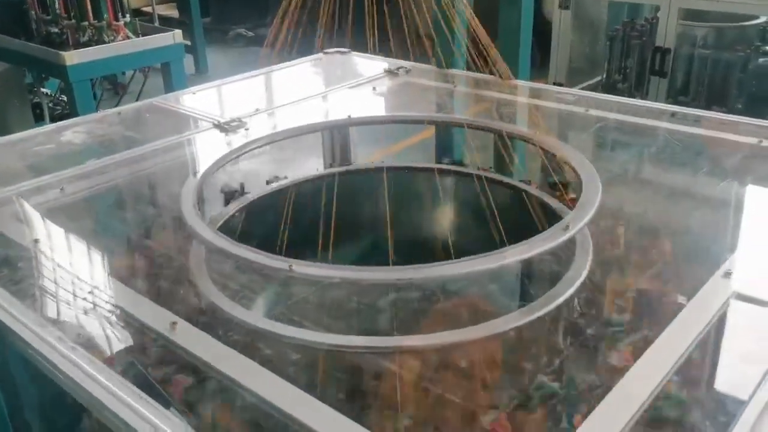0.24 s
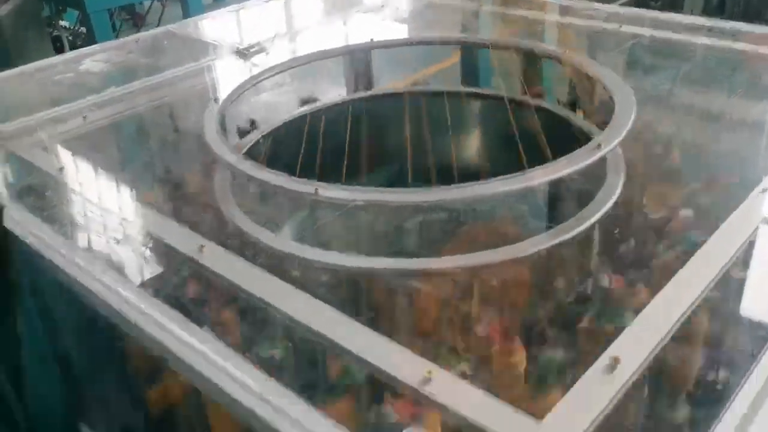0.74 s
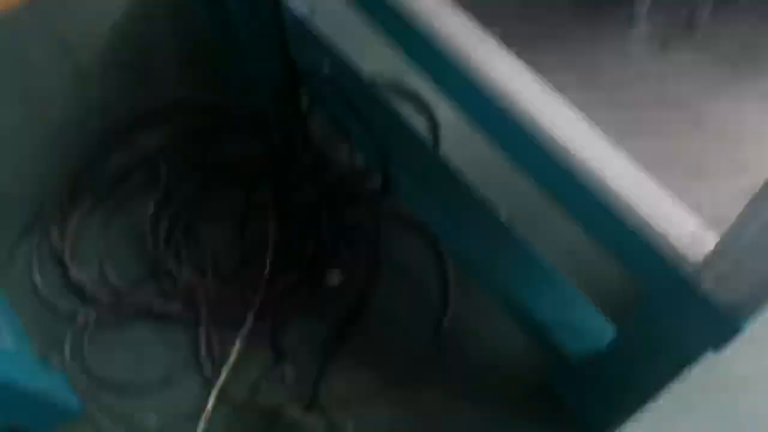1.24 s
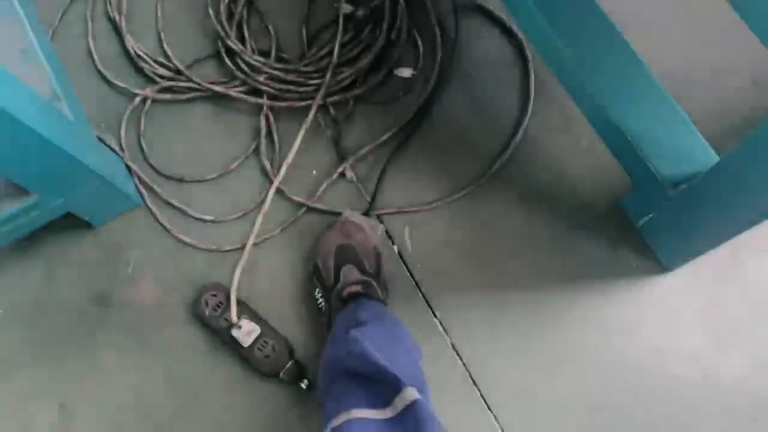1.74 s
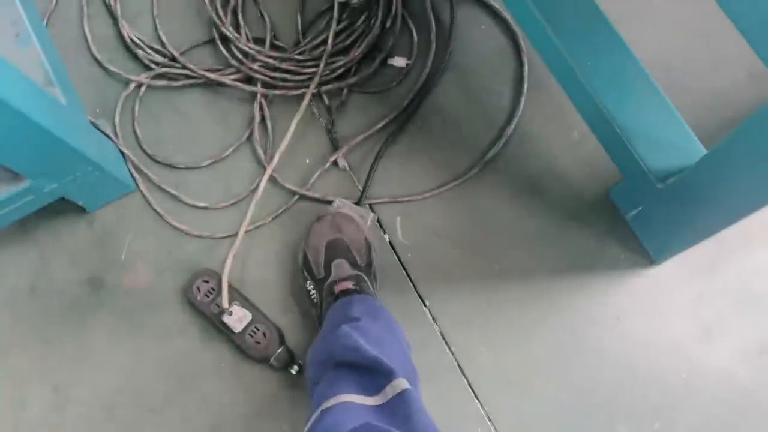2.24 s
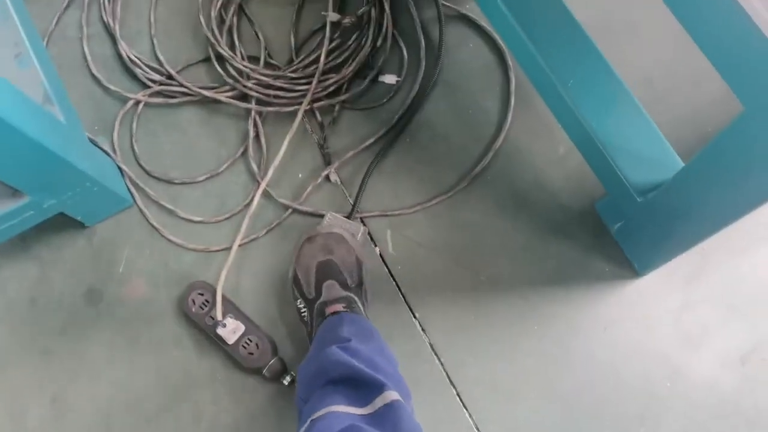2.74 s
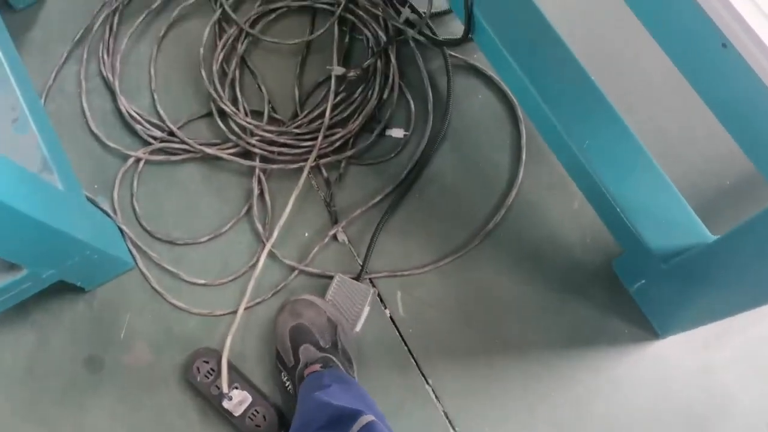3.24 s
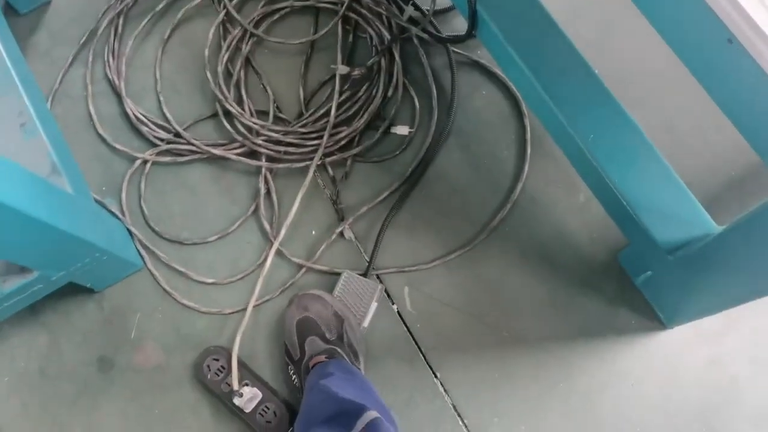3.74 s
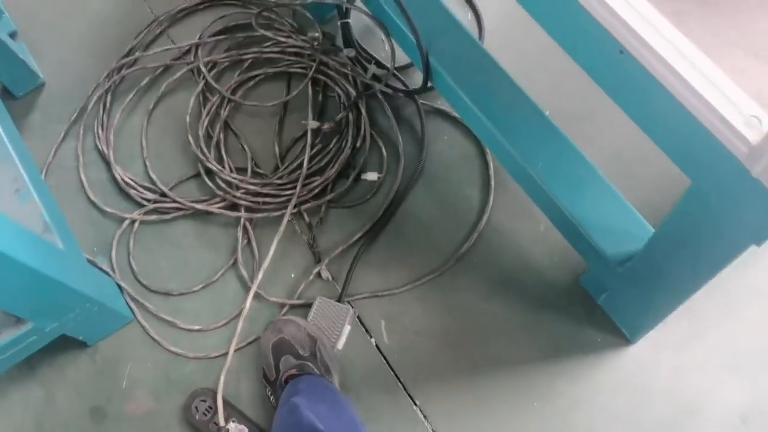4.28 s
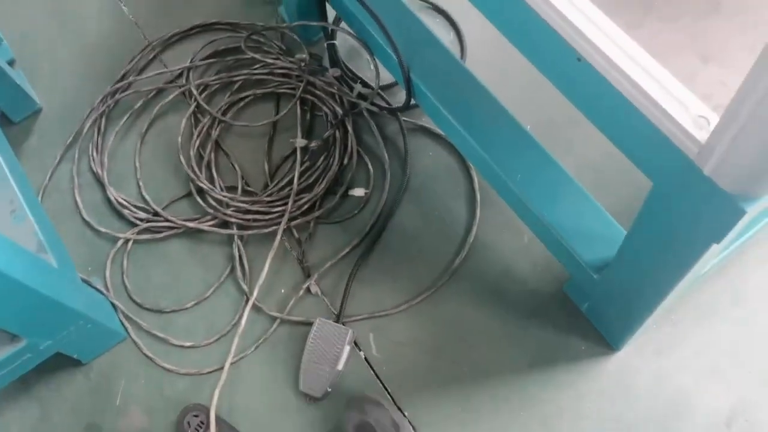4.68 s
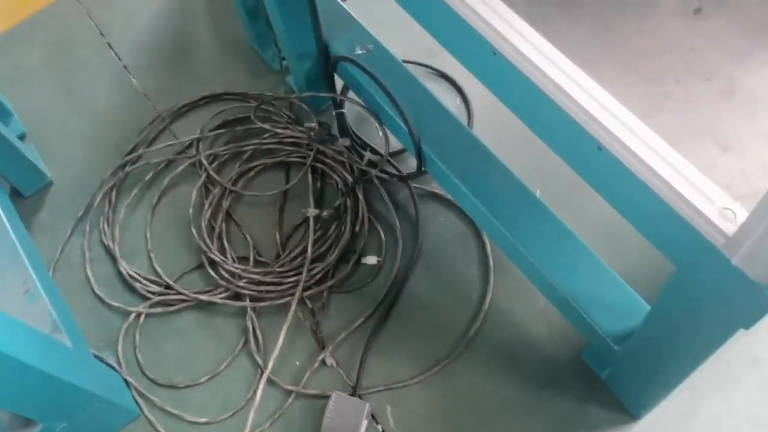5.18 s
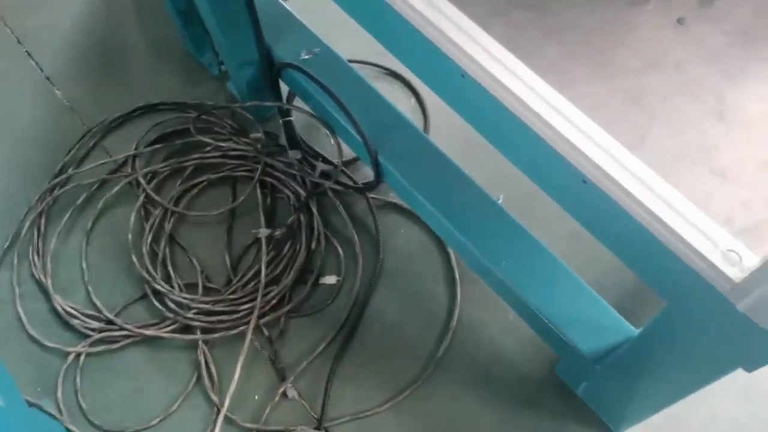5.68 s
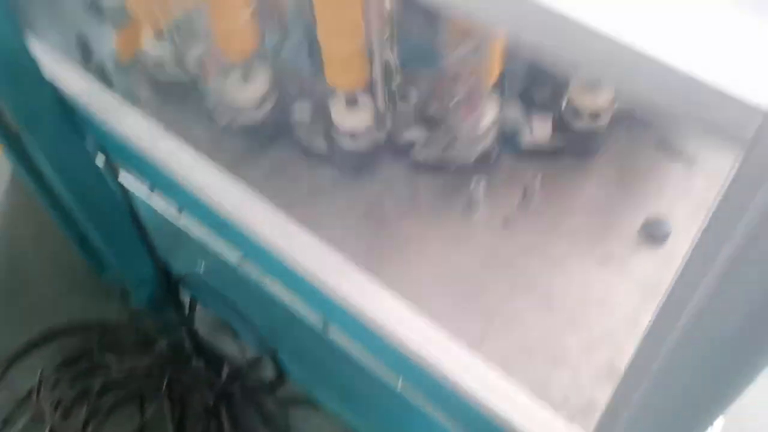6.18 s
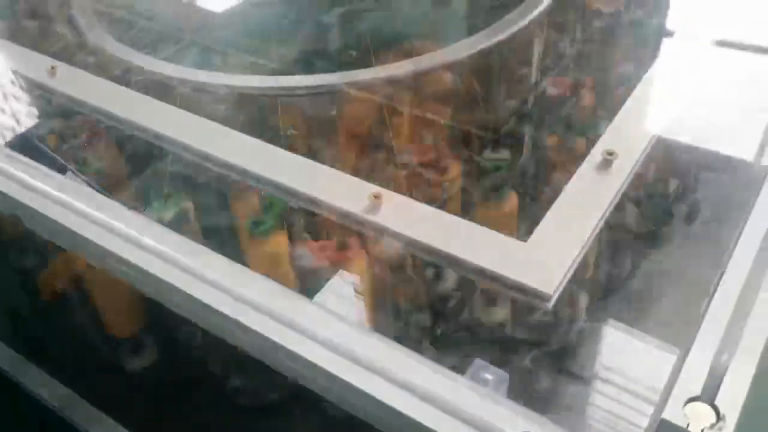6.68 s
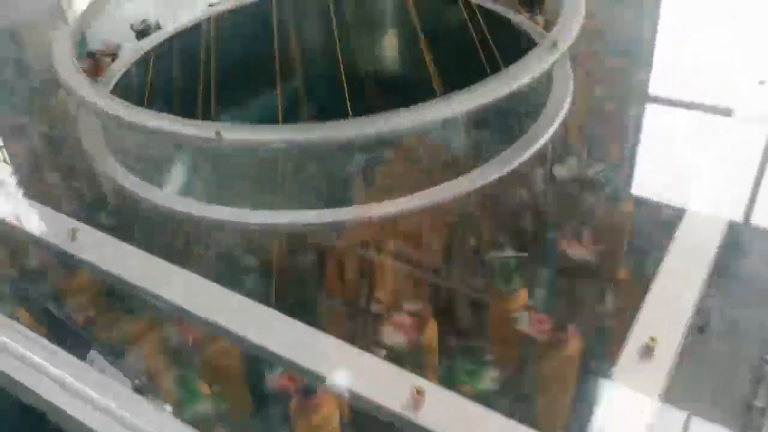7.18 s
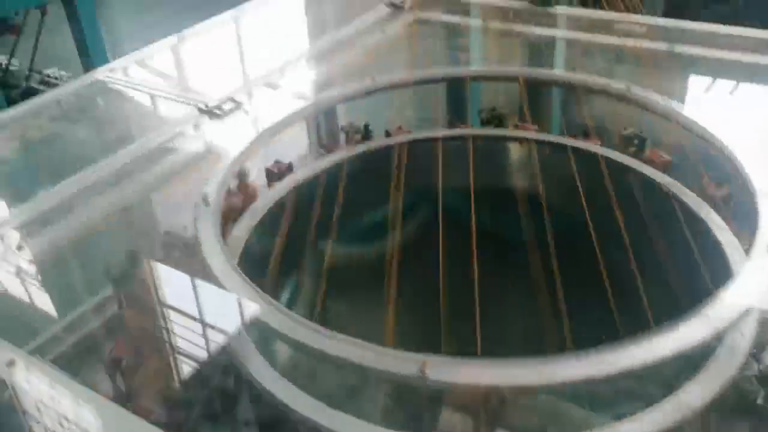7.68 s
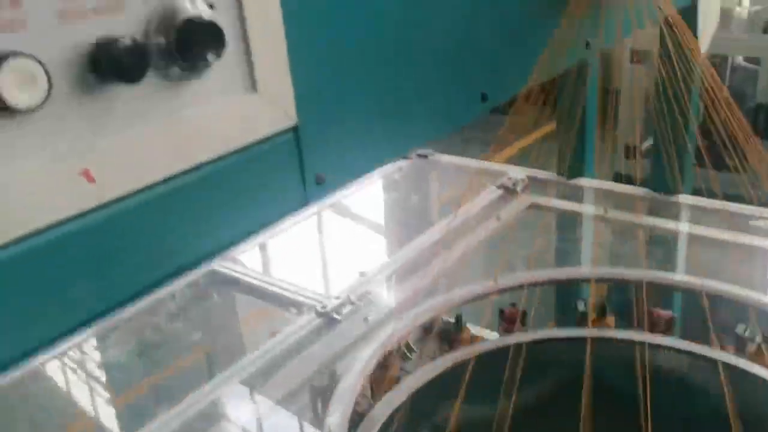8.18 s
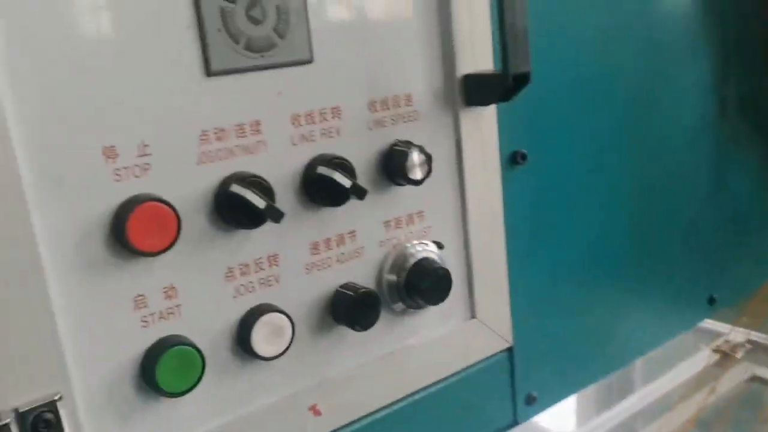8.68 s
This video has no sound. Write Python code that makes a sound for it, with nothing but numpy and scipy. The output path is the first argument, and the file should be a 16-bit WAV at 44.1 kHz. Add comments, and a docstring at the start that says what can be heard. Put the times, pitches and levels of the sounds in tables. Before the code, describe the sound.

Loud, crowded mechanical clatter of bobbin carriers knocking under a plastic hood, with clanks and bright ticking. It winds down twice into quiet hall drone with a faint high drive whistle. Each restart follows small dry pedal clicks and a switch clack, then the rattle quickly builds. The handheld microphone moves from above the hood toward the floor and back up beside the machine; the last run is steady.

```python
"""Braiding machine with a foot pedal

A braiding machine runs under a plastic hood in a factory hall, and is stopped and restarted twice by pedal.
Nearly nine times a second the horn gears hand over the bobbin carriers: random blows ring frame, hood and steel.
The pauses leave the hall's filtered noise, a thin whine, the pedal's clicks and the whistle of the motor drive."""
import sys
import numpy as np
from scipy import signal
from scipy.fft import rfft, irfft
from scipy.io import wavfile
from scipy.ndimage import map_coordinates

SR = 44100
rng = np.random.default_rng(int(sys.argv[2]) if len(sys.argv) > 2 else 0)


def master_out(mix):
    """Clip the mix to full scale and print it as 16-bit PCM to the path in sys.argv[1]."""
    frames = np.transpose(np.atleast_2d(mix))
    ceiling = np.clip(frames, -1, 1)
    pcm = np.round(ceiling * 32767).astype(np.int16)
    wavfile.write(sys.argv[1], SR, pcm)


N = 393372
TIME = np.arange(N) / SR  # s
HZ = np.fft.rfftfreq(8192, 1 / SR)  # frequencies at which filter gains are given


def amp(db):
    """Turns decibels into a gain."""
    return 10 ** (np.asarray(db) / 20)


def unit(x):
    """Scales a sound to rms 1."""
    return x / np.sqrt(np.mean(x ** 2) + 1e-20)


def shape(points):
    """Gain at each frequency, drawn as a line through the points of a colour table."""
    hz, db = np.transpose(points)
    return amp(np.interp(np.log(HZ + 1), np.log(hz + 1), db))


def peaks(modes):
    """Gain at each frequency of a set of resonances; width is measured at half the peak gain."""
    return sum(amp(db) / (1 + (2 * (HZ - hz) / width) ** 2) for hz, width, db in modes)


def colour(x, gain):
    """Filters a sound with the given gain, without sounding ahead of it; the filter has energy 1."""
    both_sides = np.r_[gain, gain[-2:0:-1]]
    log_gain = np.log(np.maximum(both_sides / gain.max(), 1e-5))
    # the Hilbert transform gives the phase that puts the response as early as possible
    spectrum = np.exp(np.conj(signal.hilbert(log_gain)))
    taps = np.fft.ifft(spectrum).real[:len(HZ)]
    return signal.oaconvolve(x, taps / np.linalg.norm(taps))[:len(x)]


def noise(gain):
    """Steady coloured noise of rms 1."""
    return unit(colour(rng.standard_normal(N), gain))


def ring(t60):
    """A crowd of evenly strong modes dying together, of energy 1; t60 (s) sets how fast."""
    t = TIME[:SR // 2]
    fade = amp(-60 * t / t60)
    tail = rng.standard_normal(len(t)) * fade
    for _ in range(3):  # even out the spectrum, then fade again
        modes = rfft(tail)
        even = irfft(modes / (abs(modes) + 1e-12), len(t))
        tail = even * fade ** .25
    return tail / np.linalg.norm(tail)


def linger_factor(t60):
    """Share of the energy left after one sample, for a decay of 60 dB in t60 seconds."""
    return np.exp(-2 * np.log(1000) / (t60 * SR))


def echo(x, t60, wet_db):
    """Diffuse reflections of moving parts: a wash of noise that follows the sound's energy and dies away."""
    keep = linger_factor(t60)
    energy = signal.lfilter([1 - keep], [1, -keep], x ** 2)
    return x + amp(wet_db) * np.sqrt(energy) * rng.standard_normal(len(x))


def waver(x, depth, per_s, count=12):
    """Lets a sound wander in pitch by the given share (rms), through a slowly varying delay."""
    rates = per_s * np.geomspace(.25, 2, count)  # Hz
    delay = sum(np.sin(2 * np.pi * (rate * TIME + rng.random())) / (2 * np.pi * rate) for rate in rates)
    moments = TIME + depth * np.sqrt(2 / count) * delay
    return map_coordinates(x, [moments * SR], order=3, mode="mirror")


def rub(start, length, db, first_hz, last_hz, width):
    """One unsteady resonance that swells, slides in pitch and fades."""
    along = np.clip((TIME - start) / length, 0, 1)
    heard = (along > 0) & (along < 1)
    flutter = rng.standard_normal((SR, 2)) @ [1, 1j]
    keep = np.exp(-np.pi * width / SR)
    flutter = signal.lfilter([1], np.poly([keep, keep]), flutter)[-heard.sum():]
    turns = np.cumsum(first_hz + (last_hz - first_hz) * along[heard]) / SR
    tone = unit((flutter * np.exp(2j * np.pi * turns)).real)
    out = np.zeros(N)
    out[heard] = amp(db) * np.sin(np.pi * along[heard]) * tone
    return out


# the microphone's way past four places: 0 over the hood, 1 near the floor, 2 beside the hood, 3 by the panel
# columns: t/s, place number
MIC_PATH = [(1.0, 0), (1.3, 1), (4.6, 1), (5.9, 2), (7.2, 2), (7.6, 3)]


def mic_place():
    """Place of the microphone at each moment, with fractions on the way between two places."""
    return np.interp(TIME, *np.transpose(MIC_PATH))


def nearness(place_db):
    """Gain of a source as the microphone moves from place to place."""
    return amp(np.interp(mic_place(), np.arange(len(place_db)), place_db))


def body(modes, place):
    """Gain at each frequency of the frame or the hood, heard from one place."""
    return np.sqrt(sum(amp(db[place]) ** 2 / (1 + (2 * (HZ - hz) / width) ** 2) ** 2
                       for hz, width, *db in modes))


def carried(x, modes):
    """Rings a body whose colour changes as the microphone moves from place to place."""
    where, out = mic_place(), np.zeros(N)
    for k in range(4):
        gain = body(modes, k)
        share = np.maximum(1 - abs(where - k), 0)
        out += share * np.linalg.norm(gain) * colour(x, gain)
    return unit(out)


# colour of the hall's murmur; columns: f/Hz, relative level/dB
HALL_COLOUR = [(15, -63), (25, -14), (92, -16), (154, -13.5), (188, -10), (313, -8.5), (510, -7.5),
               (665, -6.5), (1010, -11), (1540, -14.5), (1650, -12.5), (5000, -31.2), (6500, -64),
               (11000, -120)]
# colour of a soft hiss; columns: f/Hz, relative level/dB
HISS_COLOUR = [(3500, -20), (4800, -8), (5900, 2), (6500, -6), (7400, -1), (7900, -8), (8400, -22),
               (13500, -22)]
MURMUR_DB, HISS_DB, WHINE_DB = -46, -71.5, -63.7
# machines far off, each with its own pitch
# columns: f/Hz, width/Hz, level in the first pause/dB, level in the second pause/dB
FAR_DRONES = [(189, 18, -65, -63.5), (345, 36, -59, -57), (430, 44, -58.5, -57.5), (517, 43, -58, -61),
              (672, 47, -58, -61), (825, 60, -63, -62), (944, 23, -65, -66), (1238, 70, -61, -62)]
# middles of the two pauses; entries: t/s
PAUSE_MIDDLES = (3.1, 4.9)
# a far motor swells now and then; columns: start t/s, length/s, level/dB, first f/Hz, last f/Hz, width/Hz
FAR_MOTOR = [(2.69, .28, -51, 690, 670, 30), (2.95, .1, -50, 505, 515, 25), (3.05, .2, -47, 685, 660, 30)]


def hall():
    """Noise bands make the murmur, drones and hiss of the hall; a thin electrical whine flickers above them."""
    murmur = amp(MURMUR_DB) * noise(shape(HALL_COLOUR))
    drones = sum(amp(np.interp(TIME, PAUSE_MIDDLES, db)) * noise(peaks([(hz, width, 0)]))
                 for hz, width, *db in FAR_DRONES)
    drones = waver(drones, depth=.025, per_s=3)
    swells = sum(rub(*row) for row in FAR_MOTOR)
    flicker_db = 1.6 * noise(peaks([(0, 12, 0)]))  # slow random ups and downs
    whine = amp(WHINE_DB + flicker_db) * noise(peaks([(5484, 240, 0)]))
    hiss = amp(HISS_DB) * noise(shape(HISS_COLOUR))
    return murmur + drones + swells + whine + hiss


# the shoe slides off the pedal; entries: start t/s, length/s, level/dB, first f/Hz, last f/Hz, width/Hz
SHOE_SCUFF = (4.74, .32, -58, 3350, 3050, 700)


def shoe():
    """The sole rubs briefly over the pedal: a broad, unsteady resonance."""
    return rub(*SHOE_SCUFF)


# clicks of the pedal
# columns: t/s, case peak level/dB, lever peak level/dB, spring peak level/dB, t60/s, pitch factor of the modes
PEDAL_CLICKS = [(3.114, -43, -56, -43, .03, 1), (3.122, -37, -49, -51, .03, .9),
                (3.131, -37, -45, -38, .03, 1.02), (3.141, -44, -52, -42, .025, 1.02),
                (3.2345, -38, -39, -31, .012, .97), (3.2358, -42, -38, -23, .022, 1),
                (4.767, -44, -50, -45, .15, 1), (5.324, -46, -50, -43, .05, 1),
                (5.338, -35, -41, -47, .045, 1), (5.3523, -21.5, -20.5, -42, .006, 1),
                (5.3555, -29, -26.5, -42, .022, 1), (5.3682, -31, -27, -26, .014, .91),
                (5.387, -29, -26, -22, .016, 1.02), (5.3905, -33, -33, -24, .018, .96)]
# modes of the pedal's case, its lever and its switch spring; columns: f/Hz, width/Hz, relative level/dB
PEDAL_CASE = [(740, 220, -6), (1050, 200, 1.5)]
PEDAL_LEVER = [(2720, 260, -2), (3120, 260, 1), (3950, 350, -14), (5600, 400, -12)]
PEDAL_SPRING = [(4650, 600, -5), (5500, 400, -5), (6300, 600, -4), (7050, 600, 2), (7150, 45, 2),
                (9600, 1100, -9), (11800, 700, -9), (13300, 500, -17)]


def pedal():
    """Each click rings the case, the lever and the spring, chatters briefly and echoes off floor and frame."""
    out, t = np.zeros(N), TIME[:SR // 5]
    for s, case_db, lever_db, spring_db, t60, pitch in PEDAL_CLICKS:
        chatter = rng.standard_normal(len(t)) * amp(-60 * t / t60)
        chatter[0] += 8  # an extra push at the first contact
        for modes, db in (PEDAL_CASE, case_db), (PEDAL_LEVER, lever_db), (PEDAL_SPRING, spring_db):
            tuned = [(hz * pitch, width, level) for hz, width, level in modes]
            click = colour(echo(chatter, t60=0.14, wet_db=-11), peaks(tuned))
            out[round(s * SR):][:len(t)] += amp(db) * click / abs(click).max()
    return out


# one row a run of the machine
# columns: drive on t/s, starts turning t/s, full speed t/s, starts slowing t/s, at rest t/s,
# relative level of the drive's whistle/dB
MACHINE_RUNS = [(-1.2, -1, -.5, 2.1, 2.41, -3), (3.27, 3.43, 3.81, 4.25, 4.6, -7),
                (5.41, 5.62, 5.915, 9.5, 9.9, -1)]
# moment of one hand-over in each run, which sets the gears' timing; entries: t/s
HANDOVER_TIMES = [1.106, 4.033, 7.435]
# force of the blows through one hand-over, before each noise takes its share
# columns: share of the cycle, relative level/dB
BLOW_FORCE = [(0, 0), (.05, -2), (.13, 0), (.22, 0), (.38, -1), (.46, -3), (.56, -1), (.75, -3), (.92, -4)]
BEAT_HZ = 8.76  # hand-overs a second at full speed


def motion():
    """Speed of the gears (0-1) and force of the blows (dB) as the gears turn through each hand-over."""
    speed, force_db = np.zeros(N), np.zeros(N)
    for (on, start, full, slowing, rest, whistle_db), beat in zip(MACHINE_RUNS, HANDOVER_TIMES):
        ramp = np.interp(TIME, [start, full, slowing, rest], [0, 1, 1, 0])
        turns = np.cumsum(ramp) * BEAT_HZ / SR
        turns -= turns[round(beat * SR)]
        force_db += (ramp > 0) * np.interp(turns, *np.transpose(BLOW_FORCE), period=1)
        speed += ramp
    return speed, force_db


DRIVE_HOLD_S = .16  # the fading whistle lasts this long after the gears have stopped


def drive():
    """The motor drive whistles at its switching frequency, and gives way to broad sidebands at speed."""
    speed = motion()[0]
    powered = sum(amp(whistle_db) * np.interp(TIME, [on, start, slowing, rest + DRIVE_HOLD_S], [0, 1, 1, 0])
                  for on, start, full, slowing, rest, whistle_db in MACHINE_RUNS)
    tone = amp(-62.5) * unit(np.sin(2 * np.pi * 10002 * TIME))
    whistle = tone + amp(-59) * noise(peaks([(9990, 54, 0)]))
    sidebands = amp(-53.5) * noise(peaks([(9850, 290, 0)]))
    return powered * (1 - speed) * whistle + speed ** 1.5 * sidebands


CRACK_S, CHATTER_DB = .004, -5  # fading time of the crack; level at which the chatter begins


def strikes(rows, gain, t60):
    """Single blows, each a crack and a short chatter that ring the given body."""
    out, t = np.zeros(N + SR // 2), TIME[:SR // 2]
    for s, db in rows:
        force = np.exp(-t / CRACK_S) + amp(CHATTER_DB - 60 * t / t60)
        blow = colour(rng.standard_normal(len(t)) * force, gain)
        out[round(s * SR):][:len(t)] += amp(db) * blow / abs(blow).max()
    return out[:N]


# the contactor closes just after each press of the pedal; columns: t/s, relative peak level/dB
CONTACTOR_CLOSES = [(3.385, -42), (5.49, -32.5)]
# modes of its cabinet; columns: f/Hz, width/Hz, relative level/dB
CABINET_MODES = [(1300, 700, 0), (2300, 1100, 1), (3680, 1500, -1)]


def contactor():
    """A contactor snaps shut and rings the modes of the cabinet."""
    return amp(-0.5) * strikes(CONTACTOR_CLOSES, peaks(CABINET_MODES), t60=0.37)


# brief tones of dry gears and guides, and a groan of the motor before the last start
# columns: start t/s, length/s, level/dB, first f/Hz, last f/Hz, width/Hz
BRIEF_TONES = [(3.74, .1, -34, 2215, 2195, 40), (3.8, .55, -36, 2260, 2040, 80),
               (4.22, .55, -45.5, 830, 815, 150), (5.5, .26, -53, 770, 830, 120),
               (6.17, .08, -32, 1830, 1830, 200)]


def singing():
    """Brief tones of dry gears and guides, and a groan of the motor before the last start: unsteady resonances."""
    return sum(rub(*row) for row in BRIEF_TONES)


# deep thuds of the gears into the frame, at full speed and while starting or stopping
# columns: t/s, relative peak level/dB
GEAR_THUDS = [(.339, -18), (1.15, -19), (3.652, -18), (4.218, -14), (4.43, -21), (4.552, -30), (4.61, -32),
              (5.735, -26), (5.8, -21), (5.878, -16), (5.97, -15), (6.758, -20), (8.086, -15)]
# a carrier knocks hard under the hood and the nearest panel rings
# columns: t/s, relative peak level/dB, panel f/Hz
CARRIER_KNOCKS = [(.191, -12, 430), (.79, -9, 775), (.9, -11, 732), (1.335, -9, 420), (1.473, -8, 430),
                  (1.832, -11, 390), (1.926, -10, 420), (2.055, -12, 710), (3.805, -13, 340),
                  (3.824, -13, 818), (3.912, -12, 500), (4.142, -13, 400), (4.432, -20, 430),
                  (5.792, -15, 780), (5.83, -15, 420), (5.95, -11, 480), (6.059, -9, 796),
                  (6.299, -10, 700), (6.481, -11, 420), (6.635, -9, 710), (7.219, -10, 796),
                  (7.32, -11, 430), (7.389, -9, 710), (7.69, -7.5, 689), (7.78, -9.5, 750),
                  (8.009, -12, 882), (8.822, -8.5, 775)]
# steel clanks as one carrier jostles the next; columns: t/s, relative peak level/dB
CARRIER_CLANKS = [(.433, -16), (.886, -16), (1.361, -14), (1.794, -15), (2.047, -14), (2.225, -21),
                  (2.305, -29), (4.091, -18), (5.964, -17), (6.198, -10.5), (6.318, -13), (7.966, -14),
                  (8.246, -15), (8.585, -15)]
# sharp snaps of a pawl; columns: t/s, relative peak level/dB
PAWL_SNAPS = [(.091, -20), (.33, -21), (.784, -19), (0.8894, -21), (.918, -20), (1.579, -21), (1.6811, -22),
              (2.08, -20), (3.934, -22), (6.018, -22), (6.414, -18), (6.662, -21), (7.241, -20),
              (7.5674, -16.5), (8.1259, -22), (8.486, -18.5)]
# all the pawls chatter when the gears lurch at a start or a stop; columns: t/s, relative peak level/dB
GEAR_LURCHES = [(3.662, -26), (4.425, -25), (5.7, -37), (5.785, -27)]


def single_blows():
    """Thuds, knocks, clanks and snaps that stand out: each a burst of noise that rings the part it strikes."""
    low_frame = body(FRAME_MODES, place=1) + peaks([(190, 74, -4), (377, 160, -15)])
    thuds = amp(-6.5) * strikes(GEAR_THUDS, low_frame, t60=.19)
    hood = body(HOOD_MODES, place=2)
    knocks = amp(-8.7) * sum(strikes([(s, db)], hood + peaks([(hz, 40, 7)]), t60=.19)
                             for s, db, hz in CARRIER_KNOCKS)
    clanks = amp(-3.3) * strikes(CARRIER_CLANKS, shape(CARRIER_COLOUR), t60=.19)
    snaps = amp(-3) * strikes(PAWL_SNAPS, shape(PAWL_COLOUR), t60=0.055)
    jerks = amp(-2) * strikes(GEAR_LURCHES, shape(PAWL_COLOUR), t60=.28)
    return thuds + knocks + clanks + snaps + jerks


def effort(speed, law, place_db):
    """Gain of one noise of the machine: it follows the speed, and the hall holds it for a moment after a stop."""
    exponent, t60, linger_db = law
    energy = speed ** (2 * exponent)
    keep, share = linger_factor(t60), amp(linger_db) ** 2
    lingering = signal.lfilter([1 - keep], [1, -keep], energy, zi=[keep * energy[0]])[0]
    return nearness(place_db) * np.sqrt((energy + share * lingering) / (1 + share))


def blow_rate(speed, per_s):
    """Blows a second: fewer as the gears slow."""
    return per_s * (.3 + .7 * speed)


def impacts(speed, force_db, per_s, spread_db, t60, count=12):
    """Many loose parts strike at random, each with its own ring; blows thin out as the gears slow."""
    rate = blow_rate(speed, per_s)
    size = amp(spread_db * np.minimum(rng.exponential(1, N), 4)) * rng.choice([-1, 1], N)
    struck = rng.random(N) < rate / SR
    blows = unit(size * struck / np.sqrt(rate)) * amp(force_db)
    part = rng.integers(0, count, N)
    return sum(signal.oaconvolve(blows * (part == k), ring(t60))[:N] for k in range(count))


# modes of the frame; columns: f/Hz, width/Hz, relative level/dB at places 0, 1, 2, 3
FRAME_MODES = [(52.4, 18, -18, -13, -18, -14), (97, 30, -14.5, -10.5, -8.5, -3),
               (115.8, 25, -3, -2.5, -2.5, -7), (161.7, 36.5, -3, -4, -2.5, -1),
               (204, 45.4, -3.5, -2.5, -2, -3)]
# how thumps grow and linger; entries: exponent of the speed, t60/s, lingering share/dB
THUMP_GROWTH = (1.2, .9, -3.5)
# thumps at full speed; entries: level/dB at places 0, 1, 2, 3
THUMP_LEVEL = (-33.8, -32.6, -32.6, -32.7)


def frame_thumps(speed, force_db):
    """Gears thump the frame: dense random blows ring its low modes."""
    thumps = impacts(speed, 0.4 * force_db, per_s=900, spread_db=0.5, t60=0.025, count=8)
    return effort(speed, THUMP_GROWTH, THUMP_LEVEL) * carried(thumps, FRAME_MODES)


# modes of the plastic hood; columns: f/Hz, width/Hz, relative level/dB at places 0, 1, 2, 3
HOOD_MODES = [(290.6, 75, -8, -5, -6, -8), (353, 84, -18, -4.5, -9.5, -8.5),
              (419.3, 135, -1.5, -3.5, -2.5, -0.5), (522, 54, -10.0, -4.5, -11.5, -3.5),
              (579, 91, -7, -3.5, -1, -2.5), (682, 100, -6, -4, -2, -1.5), (756, 129, -5, -3.5, -2, -6),
              (846, 130, 0.5, -3.5, -4, -4), (924, 81, -5.5, -7, -4, -5.5),
              (1067, 320, -7.5, -7.5, -8.5, -11.5), (1253, 410, -12, -11.5, -10.5, -13.5)]
# sharp modes of the steel deck; columns: f/Hz, width/Hz, relative level/dB
DECK_MODES = [(200.9, 12.3, -0.5), (438.1, 24, -1), (714, 20, -3), (1830, 23, -8)]
# how strongly the deck is heard beside the hood; columns: t/s, relative level/dB
DECK_STRENGTH = [(2.1, -12), (3.6, -19), (4.5, -18), (6.4, -11.5)]
# how knocks grow and linger; entries: exponent of the speed, t60/s, lingering share/dB
KNOCK_GROWTH = (1.55, 1.05, -8.5)
# gain of the knocks at full speed; entries: level/dB at places 0, 1, 2, 3
KNOCK_LEVEL = (-25.7, -25.3, -25.5, -26.2)


def hood_knocks(speed, force_db):
    """Carriers knock under the hood: the blows ring hood and deck, whose pitch wanders a little."""
    knocks = impacts(speed, 0.9 * force_db, per_s=640, spread_db=1.0, t60=0.035)
    hood = carried(echo(knocks, t60=0.4, wet_db=-3.5), HOOD_MODES)
    deck_gain = amp(np.interp(TIME, *np.transpose(DECK_STRENGTH)))
    deck = deck_gain * unit(colour(knocks, peaks(DECK_MODES)))
    return effort(speed, KNOCK_GROWTH, KNOCK_LEVEL) * waver(hood + deck, depth=.016, per_s=5)


# modes of a bobbin spindle, before each one's own tuning; columns: f/Hz, relative level/dB, t60/s
SPINDLE_MODES = [(1083, -3.5, 0.22), (1293, -5.5, .2), (1836, -1.5, 0.16), (1983, 0.5, 0.26),
                 (2418, -3.5, 0.2), (2876, -3, 0.11), (3082, -6.5, 0.24), (3454, -8, 0.18),
                 (4460, -7, 0.11), (4985, -10, 0.19), (7200, -9.5, 0.12)]


def spindles(speed, force_db, per_s, spread_db, detune, count=24):
    """The spindles ring on after random blows: fading sine tones, each spindle tuned a little differently."""
    t = TIME[:SR // 4]
    size = amp(force_db + spread_db * np.minimum(rng.exponential(1, N), 3))
    blows = size * (rng.random(N) < blow_rate(speed, per_s) / SR)
    which, out = rng.integers(0, count, N), np.zeros(N)
    for k in range(count):
        ping = np.zeros(len(t))
        for hz, db, t60 in SPINDLE_MODES:
            strength, off = rng.standard_normal(2)
            tone = np.sin(2 * np.pi * hz * (1 + detune * off) * t)
            ping += amp(db - 60 * t / t60) * strength * tone
        out += signal.oaconvolve(blows * (which == k), unit(ping))[:N]
    return unit(out)


# colour of the steel carriers; columns: f/Hz, relative level/dB
CARRIER_COLOUR = [(900, -27), (1350, -6), (1580, -3.6), (1850, -1.3), (2100, -2.3), (2400, -3),
                  (2900, -5.3), (3300, -6.8), (3900, -10), (4400, -22), (6000, -46.5)]
# how strongly the main gear sings out of the rattle; entries: relative level/dB at places 0, 1, 2, 3
GEAR_STRENGTH = (-12.5, -11.5, -13, -18)
# how rattles grow and linger; entries: exponent of the speed, t60/s, lingering share/dB
RATTLE_GROWTH = (1.7, .68, -4)
# gain of the rattles at full speed; entries: level/dB at places 0, 1, 2, 3
RATTLE_LEVEL = (-29.3, -28, -27.4, -27.2)


def carrier_rattle(speed, force_db):
    """Carriers rattle in their tracks; the main gear and the spindles ring with a note that drifts."""
    rattles = impacts(speed, 0.75 * force_db, per_s=620, spread_db=1.3, t60=0.028)
    carriers = amp(-1.5) * unit(colour(echo(rattles, t60=0.21, wet_db=-1.5), shape(CARRIER_COLOUR)))
    gear = nearness(GEAR_STRENGTH) * unit(colour(rattles, peaks([(2192, 120, 0)])))
    pings = amp(-6) * spindles(speed, force_db, per_s=90, spread_db=1.5, detune=.03)
    singing_parts = waver(gear + pings, depth=.02, per_s=1.5)
    return effort(speed, RATTLE_GROWTH, RATTLE_LEVEL) * (carriers + singing_parts)


# colour of the carriers' tension pawls; columns: f/Hz, relative level/dB
PAWL_COLOUR = [(2500, -25), (3900, -1.5), (4500, -0.5), (5030, -1.5), (5400, -3.5), (7300, -4),
               (7800, -6.5), (8300, -22.5), (8800, -22), (9300, -10.5), (9950, -9.5), (11400, -20),
               (11970, -12.5), (12200, -18), (14000, -27)]
# how ticks grow and linger; entries: exponent of the speed, t60/s, lingering share/dB
TICK_GROWTH = (1.45, .33, -4)
# ticks at full speed; entries: level/dB at places 0, 1, 2, 3
TICK_LEVEL = (-35.5, -36.3, -35.2, -34.4)


def pawl_ticks(speed, force_db):
    """Tension pawls tick: short, bright random blows in a wash of reflections."""
    ticks = impacts(speed, 0.78 * force_db, per_s=600, spread_db=3.0, t60=0.02)
    pawls = unit(colour(echo(ticks, t60=0.19, wet_db=6), shape(PAWL_COLOUR)))
    return effort(speed, TICK_GROWTH, TICK_LEVEL) * pawls


def machine():
    """The turning gears set the speed and the force of the blows for every moving part."""
    speed, force_db = motion()
    return (frame_thumps(speed, force_db) + hood_knocks(speed, force_db)
            + carrier_rattle(speed, force_db) + pawl_ticks(speed, force_db))


def scene():
    """All sources at one microphone."""
    background = hall() + shoe() + pedal() + drive() + contactor()
    return (background + singing() + single_blows() + machine())[None]


def record(dry):
    """Cuts the treble steeply around 14 kHz, as the recorder's band limit."""
    low_pass = signal.firwin(511, 14050, window=("kaiser", 9), fs=SR)
    return signal.oaconvolve(dry, low_pass[None], "same")


dry = scene()
out = record(dry)
master_out(out)
```